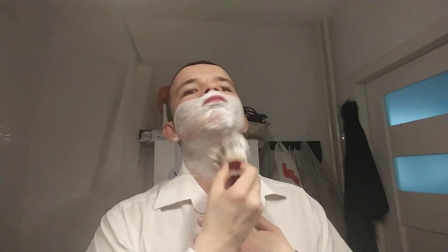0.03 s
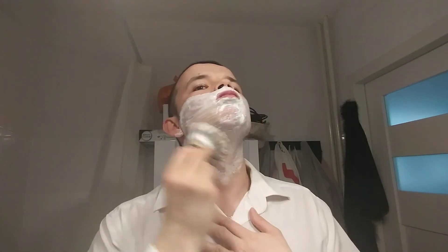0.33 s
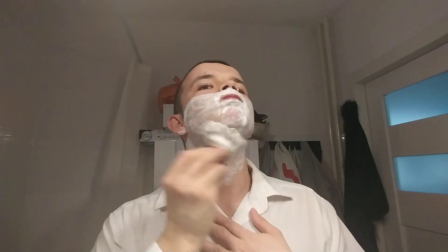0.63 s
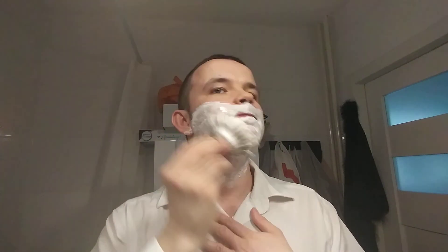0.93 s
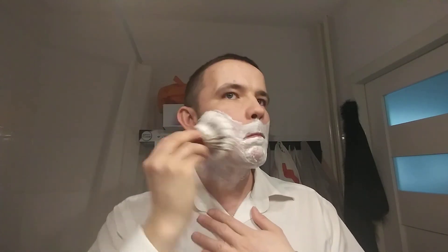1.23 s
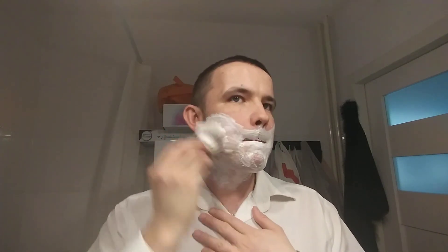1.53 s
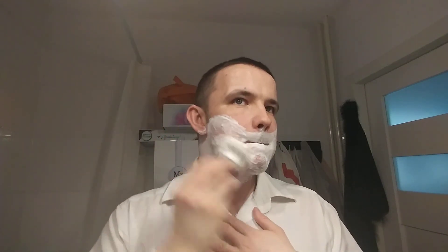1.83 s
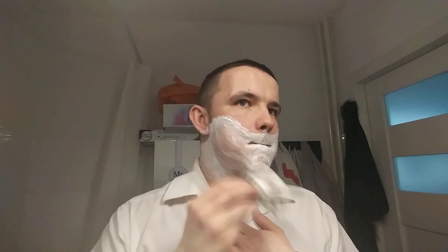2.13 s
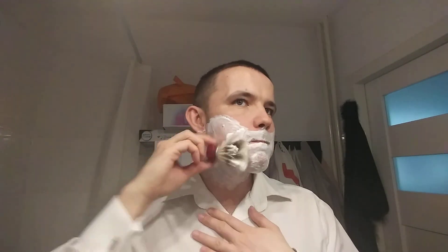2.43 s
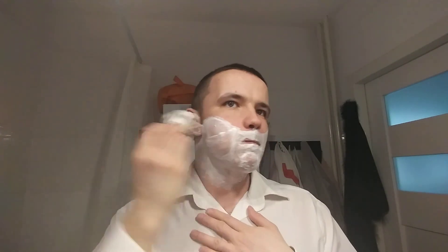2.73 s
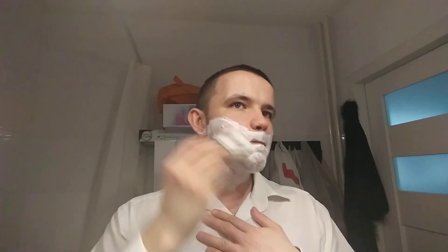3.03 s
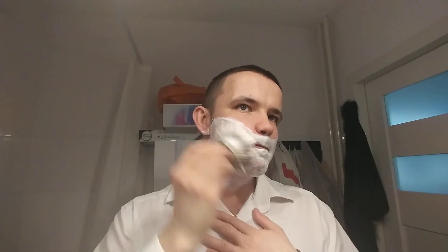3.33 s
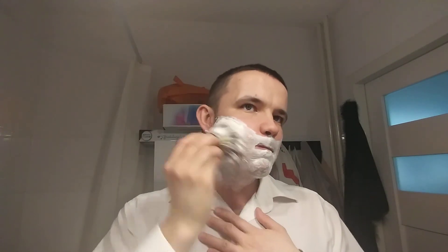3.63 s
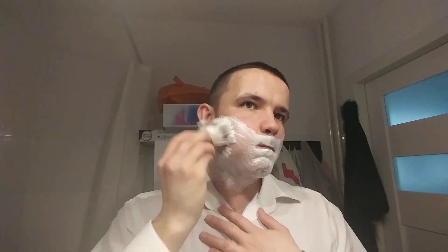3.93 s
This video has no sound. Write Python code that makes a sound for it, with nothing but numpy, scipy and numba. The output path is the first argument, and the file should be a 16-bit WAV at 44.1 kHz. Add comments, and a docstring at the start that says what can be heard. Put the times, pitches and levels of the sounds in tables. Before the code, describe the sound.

A wet shaving brush swishes quietly over a lathered face in a small bathroom, about eight strokes a second. The foam fizzes, with occasional snaps and squelches from 0.3 seconds and soft cheek pats from 1 second. After 2 seconds the strokes turn slow and soft and a sleeve rustles. From about 3 seconds they quicken again until the end at 4. The sound is bright, dipping between strokes.

```python
"""A wet shaving brush works over a lathered face in a small bathroom, about eight strokes a second.
From the start, bristles rub through foam, tiny bubbles burst and hollows ring, over a brief, faint hum.
Soon the lather snaps and squelches now and then; from one second on, the brush sometimes pats the cheek.
After two seconds the strokes turn slow and soft and a sleeve rustles; after three they pick up again.
The mono microphone is bright near 10 kHz, and its noise gate ducks the quiet moments throughout."""
import sys
import numpy as np
from scipy import signal
from scipy.io import wavfile
from numba import njit

SR = 44100
rng = np.random.default_rng(int(sys.argv[2]) if len(sys.argv) > 2 else 0)


def dump_mix(stems):
    """Bounce the given channels to the path in sys.argv[1] as a 16-bit WAV at rate SR."""
    frames = np.atleast_2d(stems).T  # one column per channel
    limited = np.clip(frames, -1, 1)  # hard clip at full scale
    pcm = np.round(limited * 32767).astype(np.int16)
    wavfile.write(sys.argv[1], SR, pcm)


N = 176400
T = np.arange(N) / SR


def amp(db):
    """Decibels to gain."""
    return 10 ** (np.asarray(db) / 20)


def unit(x):
    """Scales to rms 1."""
    return x / np.sqrt(np.mean(x ** 2) + 1e-20)


def read(points, hz):
    """Reads a table on a log-frequency axis."""
    f, value = np.transpose(points)
    return np.interp(np.log(hz + 1), np.log(f), value)


def add(mix, start_s, sound):
    """Drops a sound into the mix at its cue."""
    part = mix[round(start_s * SR):][:len(sound)]
    part += sound[:len(part)]


def colour(x, spectrum, size=4096):
    """Minimum-phase EQ of unit energy, shaped like the given spectrum."""
    log_gain = np.log(amp(read(spectrum, abs(np.fft.fftfreq(size, 1 / SR)))))
    taps = np.fft.ifft(np.exp(np.conj(signal.hilbert(log_gain)))).real[:size // 2]
    return signal.fftconvolve(x, taps / np.linalg.norm(taps))[:len(x)]


def grains(per_s, spread_db):
    """Random clicks of rms 1: many small, a few large."""
    size = amp(spread_db * np.minimum(rng.exponential(1, N), 3.2))
    return unit(size * rng.choice([-1, 1], N) * (rng.random(N) < per_s / SR))


def drift(hold_s):
    """Smooth random wander of rms 1."""
    window = np.hanning(int(2 * hold_s * SR))
    return unit(signal.fftconvolve(rng.standard_normal(N + len(window) - 1), window, "valid"))


def resonate(x, hz, width_hz):
    """A resonance that follows a pitch or a pitch curve."""
    carrier = np.exp(2j * np.pi * np.cumsum(hz * np.ones(len(x))) / SR)
    pole = np.exp(-np.pi * width_hz / SR)
    return (carrier * signal.lfilter([1 - pole], [1, -pole], x / carrier)).real


# Room tone EQ. Each row: frequency in Hz, relative level in dB.
ROOM_TONE_EQ = [(25, -35), (350, 0.5), (2000, -32.5), (10000, -2.5), (16000, -17)]

def room_tone():
    """A quiet bed of low noise and high hiss."""
    return amp(-71.5) * colour(rng.standard_normal(N), ROOM_TONE_EQ)


# Bristles resting in the lather. Each row: touch in seconds, lift in seconds, level in dB.
CONTACTS = [(-.1, 0.595, -59), (0.608, 0.82, -58.5), (0.838, 2.196, -59.5), (2.235, 2.69, -65),
            (2.807, 2.976, -65.5), (3.032, 4.1, -60)]

def contact(fade_s=0.027):
    """Envelope of the light, steady touch of the bristles between strokes."""
    return sum(amp(db) * np.clip(np.minimum(T - on, off - T) / fade_s + .5, 0, 1)
               for on, off, db in CONTACTS)


# Skin fader. Each row: time in seconds, level at the firmest touch in dB.
SKIN_FADER = [(0, -62), (1.1, -69), (1.75, -67), (2.42, -63.5), (2.92, -55.5), (3.1, -66.5), (3.3, -65),
              (4, -65)]
# Skin EQ. Each row: frequency in Hz, relative level in dB.
SKIN_EQ = [(25, -48), (60, -15), (115, -6), (160, -6.5), (270, -4.5), (680, -7), (1200, -26), (3000, -19),
           (16000, -62)]

def skin(touch):
    """The skin flutters low under the bristles."""
    envelope = touch / touch.max() * amp(np.interp(T, *np.transpose(SKIN_FADER)))
    return colour(envelope * grains(560, spread_db=5), SKIN_EQ)


# Brush strokes. Each row: fastest moment in seconds, half length in seconds, rub in dB, fizz in dB.
STROKES = [(.057, 0.031, -53.5, -54), (0.17, 0.026, -48.5, -53), (0.268, .028, -53, -56.5),
           (0.364, .016, -53, -52), (0.454, 0.03, -53, -54.5), (0.55, 0.033, -55.5, -60),
           (0.664, .026, -51, -53), (0.766, 0.037, -53, -56.5), (0.894, .028, -53.5, -55),
           (1.005, 0.035, -47, -49), (1.136, 0.035, -52, -53.5), (1.244, 0.04, -48.5, -53),
           (1.39, 0.033, -52, -53.5), (1.491, 0.035, -47.5, -49.5), (1.622, 0.027, -50.5, -52),
           (1.738, 0.036, -47, -49), (1.865, .027, -52, -53), (1.982, 0.029, -50, -51.5),
           (2.129, 0.027, -52, -50), (2.422, 0.087, -61.5, -63.5), (2.62, 0.11, -64.5, -64.5),
           (2.764, 0.022, -70.5, -77), (2.905, 0.032, -52, -54), (3.11, 0.043, -58, -57),
           (3.258, 0.033, -43.5, -45.5), (3.399, 0.042, -52, -52), (3.544, 0.029, -49.5, -50),
           (3.648, 0.026, -47, -50), (3.779, 0.026, -45.5, -46.5), (3.904, 0.039, -46, -49.5)]
# EQs for the midrange rub and the bright fizz. Each row: frequency in Hz, relative level in dB.
RUB_EQ = [(25, -44), (110, -34), (200, -6.5), (280, -8), (500, -7.5), (700, -2), (900, -3), (1300, 0),
          (1900, -1.5), (3200, -1), (4600, -6.5), (6400, -7), (7800, -15), (16000, -17.5)]
FIZZ_EQ = [(100, -33), (2000, -56), (6000, -15), (7800, -18), (8900, -5.5), (9950, 2), (10900, -5),
           (12600, -20), (15800, -17.5)]

def brush(touch):
    """Each stroke swells and fades, making bristles slip, bubbles burst and foam pockets ring."""
    rub_power, fizz_power = touch ** 2, (touch * amp(-4)) ** 2
    for peak_s, half_s, rub_db, fizz_db in STROKES:
        speed = np.exp(-.5 * ((T - peak_s) / half_s) ** 2)
        rub_power += (amp(rub_db) * speed) ** 2
        fizz_power += (amp(fizz_db) * speed ** 1.06) ** 2  # foam bursts mostly at top speed
    rub, fizz = np.sqrt(rub_power), np.sqrt(fizz_power)
    clumps = amp(.9 * drift(0.013))
    bristles = colour(rub * clumps * grains(5000, spread_db=3), RUB_EQ)
    froth = amp(1.3 * drift(0.012))
    foam = colour(fizz * clumps * froth * grains(7000, spread_db=2.5), FIZZ_EQ)
    return bristles + foam + pockets(rub)


def pockets(rub, range_hz=(944, 3545), q=22, life_s=0.033, slide=0.076, swing_db=13):
    """Small pockets in the foam open and close, their pitch sliding as they are squeezed."""
    out = np.zeros(N)
    for hz in np.geomspace(*range_hz, num=6):
        pitch = hz * np.exp(slide * drift(life_s))
        ring = unit(resonate(grains(1800, spread_db=1), pitch, hz / q))
        opening = amp(swing_db * np.tanh(drift(life_s)))
        out += ring * opening
    return rub * amp(-10) * unit(out)


# Pitched squishes. Each row: centre in seconds, level in dB, pitch in Hz.
HOLLOWS = [(0.044, -55.5, 724), (.061, -61, 1335), (.165, -58, 675), (.225, -59, 716), (.279, -51, 747),
           (.376, -58.5, 770), (.483, -61, 1300), (.528, -57, 1360), (.55, -57, 1100), (.563, -57.5, 682),
           (0.669, -57, 698), (.682, -57, 1350), (.739, -53.5, 1073), (.766, -57, 1320), (.893, -55, 1300),
           (1.022, -64.5, 705), (1.242, -54.5, 1840), (1.467, -56, 2070), (1.485, -48, 3068),
           (1.485, -51, 3400), (1.489, -59, 1313), (1.633, -58, 1310), (1.735, -53, 3100),
           (1.747, -58.5, 674), (2.898, -56, 1360), (3.255, -47, 678), (3.67, -53, 1250), (3.788, -53, 680),
           (3.917, -52.5, 945)]

def hollows(q=17.7, half_s=.016):
    """Crackle rings in a larger hollow of the foam as the brush presses over it."""
    out = np.zeros(N)
    for centre_s, db, hz in HOLLOWS:
        near = abs(T - centre_s) < .1
        swell = np.exp(-.5 * ((T[near] - centre_s) / half_s) ** 2)
        ring = swell * resonate(rng.standard_normal(N)[near], hz, hz / q)
        out[near] += amp(db) * ring * np.linalg.norm(swell) / np.linalg.norm(ring)
    return out


def hum(hz=192, start_s=0.074, end_s=0.456, fade_s=0.051):
    """A faint, low tone fades in and out."""
    envelope = np.clip(np.minimum(T - start_s, end_s - T) / fade_s, 0, 1)
    return amp(-66) * np.sqrt(2) * envelope * np.sin(2 * np.pi * hz * T)


# Bubble snaps. Each row: start in seconds, level in dB.
SNAPS = [(.273, -36.5), (0.741, -39), (1.883, -37.5), (2.838, -44.5), (3.868, -42)]

def snaps(decay_s=0.0013):
    """Single larger bubbles burst with a bright tick."""
    ticks, t = np.zeros(N), T[:SR // 10]
    for start_s, db in SNAPS:
        add(ticks, start_s, amp(db) * np.exp(-t / decay_s) * rng.standard_normal(len(t)))
    return colour(ticks, FIZZ_EQ)


# Wet squelches. Each row: start in seconds, level in dB, decay in seconds.
SQUELCHES = [(.2738, -37, 0.014), (0.728, -40, 0.0026), (1.156, -43.5, .004), (1.48, -48.5, 0.021),
             (2.883, -40.5, 0.016)]
# Squelch EQ. Each row: frequency in Hz, relative level in dB.
SQUELCH_EQ = [(100, -65), (450, -9), (700, -7), (1500, 2), (3100, 2.5), (6000, -6.5), (8000, -21),
              (10000, -26), (16000, -43)]

def squelches(attack_s=.001):
    """Trapped air escapes the lather in quick bursts of crackle."""
    bursts, t = np.zeros(N), T[:SR // 10]
    for start_s, db, decay_s in SQUELCHES:
        envelope = np.minimum(t / attack_s, 1) * np.exp(-t / decay_s)
        add(bursts, start_s, amp(db) * envelope * rng.standard_normal(len(t)))
    return colour(bursts, SQUELCH_EQ)


# Soft pats. Each row: start in seconds, level in dB, pitch in Hz, decay in seconds, relative slap in dB.
PATS = [(1.015, -51, 292, 0.024, -9), (1.108, -35.5, 282, 0.0079, -15), (1.187, -47.5, 257, 0.009, -22),
        (2.432, -45, 350, .0059, -6.5), (2.609, -48, 350, 0.006, 2.5), (2.727, -47, 300, 0.015, -0.5),
        (2.914, -52.5, 188, 0.017, -14), (3.598, -46, 276, 0.0065, -4), (3.777, -43, 277, 0.0063, -4),
        (3.95, -45, 328, 0.0049, -0.5)]
# Slap EQ. Each row: frequency in Hz, relative level in dB.
SLAP_EQ = [(25, -59), (220, 0.5), (680, 2), (1150, -7), (1700, -23), (16000, -39)]

def pats(low_cut_hz=190):
    """Patted by the brush, the cheek gives a short, damped plop with a dull slap."""
    out, t = np.zeros(N), T[:SR // 8]
    for start_s, db, hz, decay_s, slap_db in PATS:
        fade = np.exp(-t / decay_s)
        plop = fade * np.sin(2 * np.pi * hz * t)
        slap = amp(slap_db) * colour(fade * rng.standard_normal(len(t)), SLAP_EQ)
        add(out, start_s, amp(db) * (plop + slap))
    return signal.sosfilt(signal.butter(2, low_cut_hz, "high", fs=SR, output="sos"), out)


# Sleeve fader. Each row: time in seconds, level in dB.
SLEEVE_FADER = [(2.15, -86.5), (2.25, -63), (2.42, -56), (2.55, -64), (2.63, -63), (2.76, -70.5),
                (2.83, -70.5), (3.1, -67), (3.5, -63.5), (4, -58.5)]
# Cotton EQ. Each row: frequency in Hz, relative level in dB.
SLEEVE_EQ = [(25, -65), (120, -13.5), (300, 2), (420, 1.5), (700, -7), (1300, -5.5), (2200, -22.5),
             (5000, -18), (16000, -33)]

def sleeve():
    """A cotton sleeve gives a dull, grainy rustle as the arm changes grip and sweeps wider."""
    envelope = amp(np.interp(T, *np.transpose(SLEEVE_FADER)))
    return colour(envelope * grains(1500, spread_db=4.5), SLEEVE_EQ)


# Bathroom reverb. Each row: frequency in Hz, time to fall 60 dB in seconds.
REVERB_TIMES = [(100, 0.43), (500, 0.14), (3000, 0.23), (10000, 0.11), (16000, 0.23)]

def tail(echoes_per_s=3000, predelay_s=.003):
    """Sparse wall reflections, each band dying at its own speed."""
    n = SR // 2
    taps = rng.standard_normal(n) * (rng.random(n) < echoes_per_s / SR) * (T[:n] > predelay_s)
    hz, t, bands = signal.stft(taps, SR, nperseg=256)
    decay = amp(-60 * t / read(REVERB_TIMES, hz)[:, None])
    echo = signal.istft(bands * decay, SR, nperseg=256)[1]
    return echo / np.linalg.norm(echo)


# Bathroom resonances. Each row: frequency in Hz, width in Hz, linear gain.
ROOM_MODES = [(267, 53, 0.31), (427.4, 20, 0.79), (683.5, 35, 0.89), (1332, 29, 0.77), (2040, 27, 0.39),
              (2980, 130, 0.23), (3670, 100, .3)]

def room(dry, wet_db=-7.5):
    """Close walls return a short tail that changes as the brush moves, and favour a few frequencies."""
    blend = np.array([drift(.12) for _ in range(4)])  # crossfades between four tails
    blend /= np.linalg.norm(blend, axis=0)
    wet = sum(signal.fftconvolve(dry * share, tail())[:N] for share in blend)
    mix = (dry + amp(wet_db) * wet) / np.sqrt(1 + amp(wet_db) ** 2)
    return mix + sum(gain * signal.lfilter(*signal.iirpeak(hz, hz / width, SR), mix)
                     for hz, width, gain in ROOM_MODES)


def scene():
    """Everything reaches one microphone, the same in both channels."""
    touch = contact()
    foley = brush(touch) + skin(touch) + squelches() + snaps() + pats() + sleeve()
    return np.tile(room(foley) + hollows() + room_tone() + hum(), (2, 1))


@njit
def gate_gain(target, open_s, close_s):
    """The gate chases its target gain, at one speed opening and another closing."""
    out, gain = np.empty(len(target)), 1.
    for i in range(len(target)):
        lag_s = open_s if target[i] > gain else close_s
        gain += (target[i] - gain) / (lag_s * SR)
        out[i] = gain
    return out


def record(dry):
    """A noise gate ducks quiet moments quickly and eases open again; a high cut follows."""
    threshold_db, slope, depth_db, detector_s, high_cut_hz = -59.5, 5.26, 17.5, 0.008, 15900
    window = np.hanning(int(2 * detector_s * SR))
    power = signal.fftconvolve(dry[0] ** 2, window / window.sum(), "same")
    under_db = np.maximum(threshold_db - 10 * np.log10(abs(power) + 1e-14), 0)
    target = amp(-np.minimum(slope * under_db, depth_db))
    gated = dry * gate_gain(target, open_s=0.041, close_s=0.0038)
    high_cut = signal.firwin(511, high_cut_hz, window=("kaiser", 9), fs=SR)
    return signal.oaconvolve(gated, high_cut[None], "same")


dry = scene()
out = record(dry)
dump_mix(out)
```